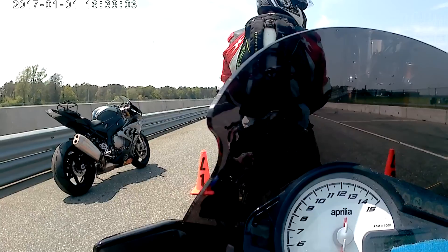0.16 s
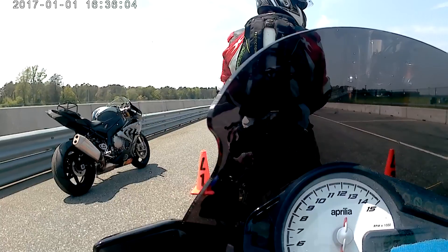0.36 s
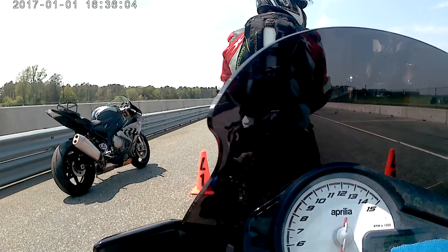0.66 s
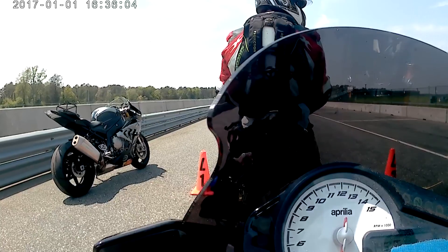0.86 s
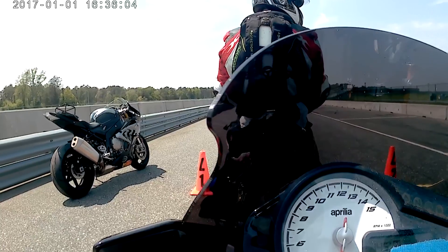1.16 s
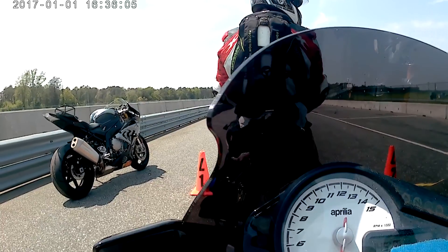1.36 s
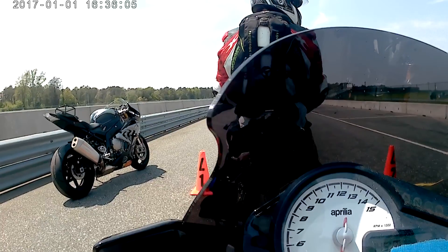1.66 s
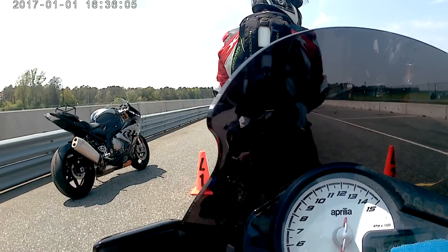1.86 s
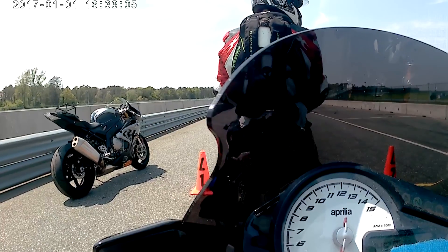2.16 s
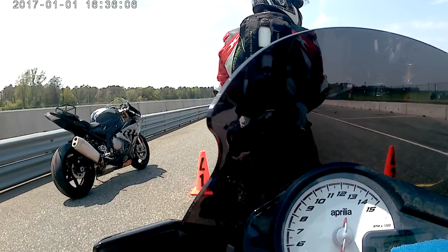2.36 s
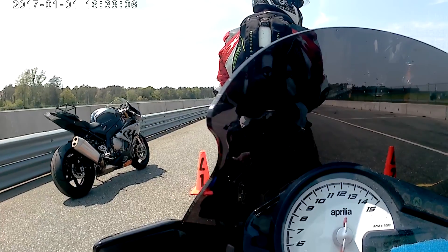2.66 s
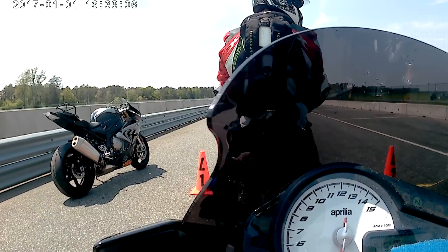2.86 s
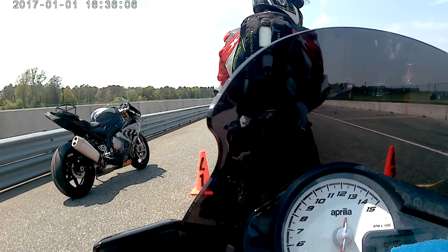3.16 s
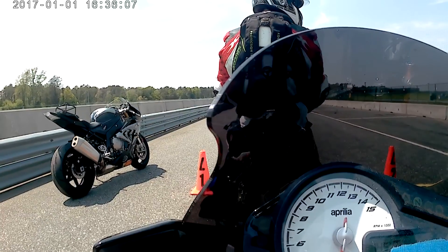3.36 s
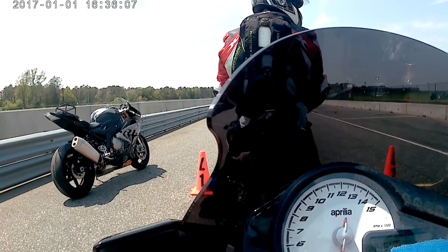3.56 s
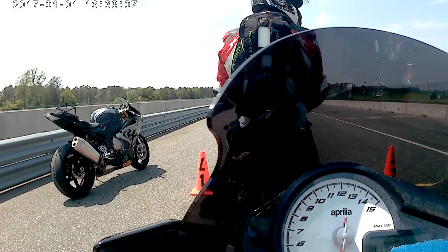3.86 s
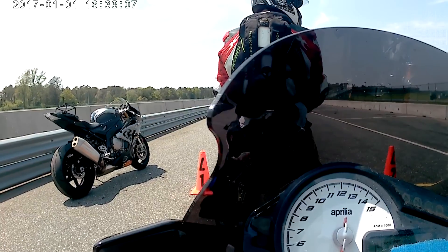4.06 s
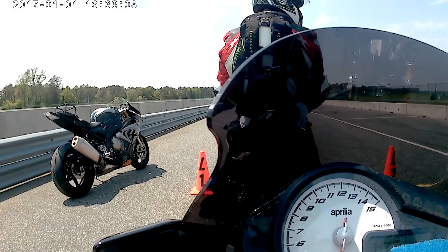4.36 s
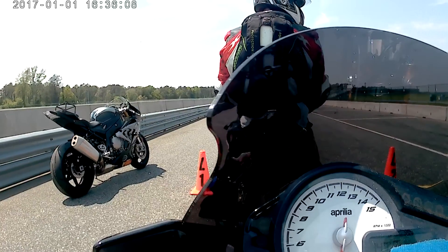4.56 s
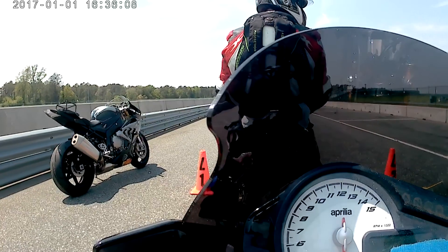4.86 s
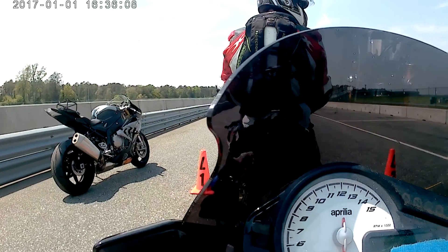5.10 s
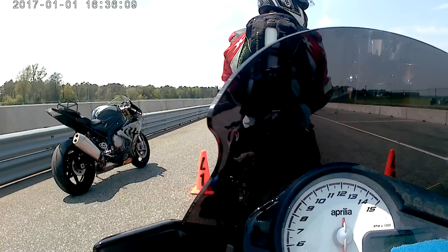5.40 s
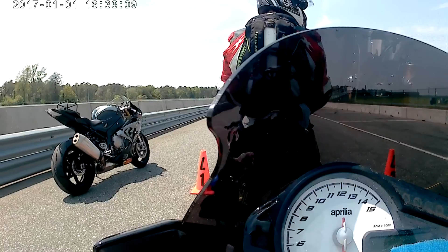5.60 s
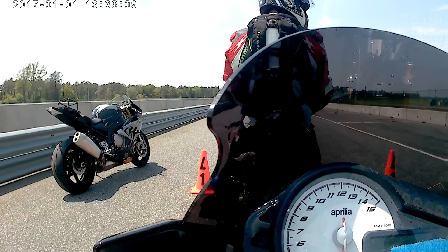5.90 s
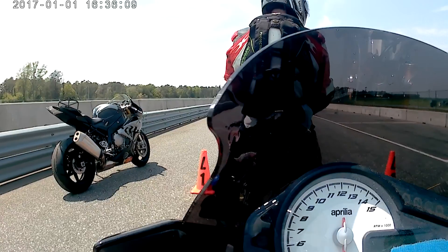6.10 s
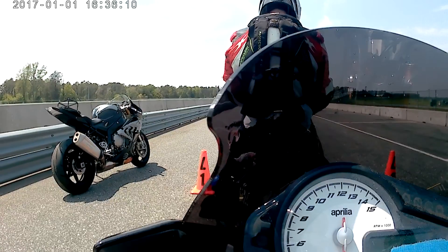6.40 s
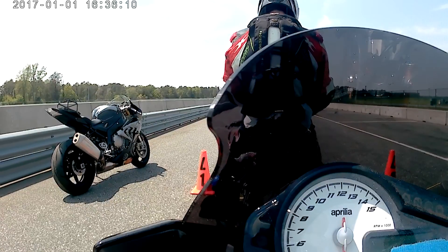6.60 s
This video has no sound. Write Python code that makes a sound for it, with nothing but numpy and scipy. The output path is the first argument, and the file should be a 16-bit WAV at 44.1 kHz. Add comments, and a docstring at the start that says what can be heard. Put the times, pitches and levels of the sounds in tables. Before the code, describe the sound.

A small camera bolted to an idling motorcycle picks up crushed, dull-trebled engine throb, rattling valve gear and flickering fairing buzz. The engine stops just past four seconds with a brief knock and stumble. Its bracket keeps wobbling at a deep note that fades, exposing far-off engines and wind at an open race track, then one faint rising chirp and a last-moment hum.

```python
"""A four-cylinder motorcycle idles, then is switched off; a small camera is bolted to its fairing.
Uneven firings excite resonances of the frame; valve gear noise rings the panels and the camera case.
A fairing panel buzzes in bursts, and the camera bracket sways at its own low note, then rings free.
A distant track rumbles behind as shaped noise; a faint chirp and a swelling hum come at the end.
The input saturates, so the strong shaking is flattened, and a narrow band dulls the treble."""
import sys
import numpy as np
from scipy import signal
from scipy.fft import rfft, irfft
from scipy.io import wavfile
from scipy.ndimage import uniform_filter1d

SR = 44100
rng = np.random.default_rng(int(sys.argv[2]) if len(sys.argv) > 2 else 0)


def log_audio(samples):
    """Write samples as a 16-bit WAV file to the path given in sys.argv[1]."""
    # one column per channel
    frames = np.atleast_2d(samples).T
    # limit to full scale, then quantise
    limited = np.clip(frames, -1, 1)
    pcm = np.round(limited * 32767).astype(np.int16)
    wavfile.write(sys.argv[1], SR, pcm)


N = 297216
TIME_S = np.arange(N) / SR
COAST_S, STOP_S = 4.0, 4.6  # the crank starts to slow, and stands still


def undb(db):
    """Amplitude ratio: 20 dB is a factor of ten."""
    return 10 ** (np.asarray(db) / 20)


def curves(table):
    """Linear interpolation: each column after the time column becomes one value a sample."""
    times_s, *columns = np.transpose(table)
    return [np.interp(TIME_S, times_s, column) for column in columns]


def unit(x):
    """Normalisation to an rms of one."""
    return x / np.sqrt(np.mean(x ** 2))


def ring(force, modes):
    """Modal superposition: second-order resonances in parallel, each set to its own rms level."""
    total = 0
    for mode_hz, width_hz, level_db in modes:
        b, a = signal.iirpeak(mode_hz, mode_hz / width_hz, SR)  # Q is frequency over bandwidth
        total = total + undb(level_db) * unit(signal.lfilter(b, a, force))
    return total


def tone(hz, rms_db):
    """Frequency modulation: a sine whose phase is the running sum of its frequency."""
    phase = 2 * np.pi * np.cumsum(hz) / SR
    return np.sqrt(2) * undb(rms_db) * np.sin(phase)


def walk(rate_hz):
    """Slow random modulation: levels held 1 / rate s and smoothed twice; spread near 1."""
    hold = int(SR / rate_hz)
    steps = np.repeat(rng.standard_normal(N // hold + 1), hold)
    return uniform_filter1d(uniform_filter1d(steps, hold), hold // 4)[:N]


def crank():
    """Rotation rate in engine cycles a second: a hunting idle, then a run-down to rest."""
    idle_hz, slow_start_hz, settle_s = 12.522, .23, .39  # a little slow at first
    hunt_hz, hunt_s, hunt_rises_s = .059, .969, .851  # swing either way, its period, an upward crossing
    coast_bend = 1.7  # power law of the slowing
    slow_start = slow_start_hz * np.exp(-(TIME_S / settle_s) ** 2)
    hunt = hunt_hz * np.sin(2 * np.pi * (TIME_S - hunt_rises_s) / hunt_s)
    progress = np.clip((TIME_S - COAST_S) / (STOP_S - COAST_S), 0, 1)
    return (idle_hz - slow_start + hunt) * (1 - progress ** coast_bend)


def strokes(angles_deg, late_deg, uneven_db):
    """Crank kinematics: sample and size of each blow, a row per angle, scattered from cycle to cycle."""
    start_deg = 655
    angle = start_deg + 720 * np.cumsum(crank()) / SR
    cycles = np.arange(int(angle[-1] / 720) + 1)
    late, size = rng.standard_normal((2, len(angles_deg), len(cycles)))
    blow_angle = 720 * cycles + np.array(angles_deg)[:, None] + late_deg * late
    at = np.searchsorted(angle, blow_angle)
    inside = (at > 0) & (at < N)
    return at, undb(uneven_db * size) * inside


def train(at, size, level_db):
    """Impulsive excitation: the blows as single samples, each angle at its own level."""
    weights = size * undb(level_db)[:, None]
    return np.bincount(at.ravel(), weights.ravel(), N + 1)[:N]


def firing():
    """Impulse response of the frame: gas pressure builds over a few ms and excites its modes."""
    # firings in the 720 degree cycle: crank_deg, level_db
    firings = [(0, 1), (180, -3), (425, 2), (605, 7)]
    # frame and fairing modes: mode_hz, width_hz, level_db
    frame_modes = [(54.56, 18.7, 4.5), (125, 12.5, -14.5), (199, 210, -4), (230.8, 12, -9.5),
                   (471, 131, -5.5), (720, 140, -19)]
    # a lower frame mode swings the other way: mode_hz, width_hz, level_db
    recoil_modes = [(38.3, 6, -3)]
    push_s = .003  # whole length of a pressure pulse
    crank_deg, level_db = np.transpose(firings)
    kicks = train(*strokes(crank_deg, late_deg=2.44, uneven_db=3.0), level_db)
    push = np.convolve(kicks, np.hanning(int(push_s * SR)), "same")
    return ring(push, frame_modes) - ring(push, recoil_modes)


def clatter():
    """Noise-excited resonance: knocks set off short rattles over steady gear noise."""
    # valve gear knocks in the cycle: crank_deg, panels_db, case_db
    knocks = [(125.6, -1.5, 1.5), (220, 3.5, -22), (271, -22.5, -16), (336, -3, -16.5), (379.3, -4.5, -3.5),
              (456, -1, 1.5), (496.6, 0, 1.5), (560.3, -2.5, -2.5), (667.8, 3, 6.5)]
    # panels rattled by the valve gear: mode_hz, width_hz, level_db
    panel_modes = [(130.5, 8, -12.5), (204, 61, -7.5), (305, 21.6, -8), (461.7, 44, -12.5),
                   (556, 60, -11.5), (639.5, 70, -9.5), (846.4, 73, -7)]
    # camera case: mode_hz, width_hz, level_db
    case_modes = [(1311, 23, -14), (1427.6, 59, -4.5), (1479.4, 51, -9), (2050, 126, -12.5),
                  (3130, 1400, -11)]
    crank_deg, *levels_db = np.transpose(knocks)
    at, size = strokes(crank_deg, late_deg=6.6, uneven_db=3.0)
    pole = np.exp(-1 / (0.0013 * SR))  # 1.3 ms time constant
    total = 0
    for level_db, modes in zip(levels_db, (panel_modes, case_modes)):
        # a double pole makes each rattle swell, then die
        rattle = unit(signal.lfilter([1], np.poly([pole, pole]), train(at, size, level_db)))
        envelope = (1.67 + rattle) * undb(1.13 * walk(29.95))
        total = total + ring(envelope * rng.standard_normal(N), modes)
    return total


def engine():
    """Superposition of two excitations, firing and clatter, each under its own force curve."""
    # force of the engine, dying away after the switch-off: time_s, firing_db, clatter_db
    force = [(0, -8.5, -5.5), (1.5, -5.5, -4.5), (4.0, -10, -5), (4.035, -6, 0.5), (4.06, -11, -12),
             (4.105, -3, -5.5), (4.12, -7, -7), (4.19, -18, -5.5), (4.21, -10, -13.5), (4.25, -23, -19.5),
             (4.36, -27.5, -22.5), (4.42, -13, -22.5), (4.47, -36, -30.5), (4.52, -59, -49)]
    firing_db, clatter_db = curves(force)
    return undb(firing_db) * firing() + undb(clatter_db) * clatter()


def buzz():
    """Intermittent contact: bursts of a note that flickers as the panel edge touches and lets go."""
    # its loudest bursts: time_s, note_hz, rms_db, sigma_s (of a Gaussian swell)
    loud_bursts = [(.125, 313.2, -2, 0.03), (0.196, 315.5, -12, 0.021), (0.398, 318.3, -6, 0.023),
                   (0.597, 314, -10.5, 0.0247), (0.772, 309.9, -7.5, 0.011), (1.013, 310, -4.5, 0.034),
                   (1.165, 310.4, 0, 0.023), (1.637, 312.2, -5.5, 0.018), (1.729, 319, -3, 0.013),
                   (1.912, 314.2, -5, .03), (2.13, 319.3, -6.5, .02), (2.36, 314, -2.5, .02),
                   (2.447, 318, 0, 0.026), (2.77, 311, -5.5, .02), (3.17, 313.3, 0.5, 0.018),
                   (3.406, 320, -0.5, 0.022), (3.71, 313, -7.5, 0.017), (3.88, 325, -2, 0.029),
                   (3.977, 319, -4.5, 0.02), (4.163, 316, -0.5, .028), (4.269, 321, -9, 0.057)]
    buzz_hz, buzz_deg, buzz_db, sigma_s = 314.7, 370, -12, .022  # the burst once a cycle
    at, size = strokes([buzz_deg], late_deg=22.5, uneven_db=3.5)
    size = size * undb(buzz_db) * (at < COAST_S * SR)
    hz = buzz_hz + 5.15 * walk(14)
    swell = np.zeros(N)
    for burst_s, gain in zip(at[0] / SR, size[0]):
        swell = np.maximum(swell, gain * np.exp(-.5 * ((TIME_S - burst_s) / sigma_s) ** 2))
    for burst_s, note_hz, rms_db, loud_sigma_s in loud_bursts:
        loud = undb(rms_db) * np.exp(-.5 * ((TIME_S - burst_s) / loud_sigma_s) ** 2)
        hz = np.where(loud > swell, note_hz, hz)  # the louder burst sets the note
        swell = np.maximum(swell, loud)
    return swell * tone(hz, 2. * walk(45))


def bracket():
    """Forced, then free vibration of two bending notes; a stiffer side gives the sway overtones."""
    # bracket while shaken: time_s, sway_rms_db, nod_rms_db
    shaking = [(0, 6.5, -10), (.15, -8.5, -8), (.35, 0, -7), (.75, -7, -6.5), (.9, -35, -30),
               (1.1, -17, -3), (1.55, -13, -17), (2.1, -16, -7), (2.75, -5, -15.5), (3.25, -4.5, -21.5),
               (3.55, -16, -8), (3.96, -33, -20), (4.05, 1, -4), (4.17, -3.5, -24), (4.35, -5, -25.5)]
    sway_hz, nod_hz = 43.3, 67.1
    wander_hz = .41  # the shaking pulls both notes about until the crank starts to slow
    sway_fade_s, sway_rub = 1.47, .23  # damping time; dry friction as a share of the swing
    nod_fade_db_per_s = 15
    sway_db, nod_db = curves(shaking)
    free_s = np.clip(TIME_S - shaking[-1][0], 0, None)
    wander = wander_hz * (np.arange(N) < COAST_S * SR)
    # dry friction brings the swing to a full stop
    left = np.clip((1 + sway_rub) * np.exp(-free_s / sway_fade_s) - sway_rub, 0, None)
    sway = left * tone(sway_hz + wander * walk(6.13), sway_db)
    nod = tone(nod_hz + wander * walk(6.4), nod_db - nod_fade_db_per_s * free_s)
    second = .04 * (sway ** 2 - (left * undb(sway_db)) ** 2)  # less its mean square
    third = -.1 * np.tanh(sway) ** 3
    return sway + second + third + nod


def track():
    """Spectrally shaped noise: far engines and wind through the housing; bass and treble waver apart."""
    # spectrum of the track, relative: bin_hz, density_db
    spectrum = [(15, -11), (55, 3.5), (98, -1), (186, -7.5), (259, -18), (311, -6.5), (349, -25.5),
                (450, -27.5), (900, -33), (1210, -24.5), (1450, -10), (1620, -19.5), (2100, -22),
                (2700, -35.5), (3150, -32.5), (3900, -35.5), (5000, -61), (6000, -93.5)]
    # bass of the track: time_s, level_db
    rumble = [(4.5, 8), (5.2, 1.5), (6.0, 1), (6.74, 2)]
    track_db, treble_db = -31, -5.0  # the treble level is relative to the track level
    bin_hz, density_db = np.transpose(spectrum)
    bins = np.fft.rfftfreq(N, 1 / SR) + 1  # 1 Hz up keeps the logarithm finite
    shape = undb(np.interp(np.log(bins), np.log(bin_hz), density_db))
    shaped = rfft(rng.standard_normal(N)) * shape
    bass = unit(irfft(shaped * (bins < 600), N))
    treble = unit(irfft(shaped * (bins >= 600), N))
    bass = bass * undb(curves(rumble)[0] + 1.5 * walk(16))
    treble = treble * undb(treble_db + 1.28 * walk(45))
    return undb(track_db) * (bass + treble)


def whistle():
    """Linear frequency sweep: one short faint chirp glides up under a two-sided exponential swell."""
    peak_s, peak_hz, peak_db = 5.388, 680, -37.5
    rise_hz_per_s, swell_db_per_s, drop_db_per_s = 2200, 262.5, 446
    from_peak_s = TIME_S - peak_s
    rms_db = peak_db + np.minimum(swell_db_per_s * from_peak_s, -drop_db_per_s * from_peak_s)
    return tone(np.clip(peak_hz + rise_hz_per_s * from_peak_s, 0, None), rms_db)


def hum():
    """Exponential growth: a steady low note gains equal decibels each second up to the end."""
    hum_hz, end_db, rise_db_per_s = 65., -27.5, 37.5
    to_go_s = TIME_S[::-1]
    return tone(np.full(N, hum_hz), end_db - rise_db_per_s * to_go_s)


def scene():
    """Linear superposition of all the sources, in one channel."""
    return (engine() + buzz() + bracket() + track() + whistle() + hum())[None]


def record(dry):
    """Saturation, band limiting and clipping: an overdriven input, a narrow converter, an output stage."""
    ceiling, knee = .71, 8.  # input limit in full scales; sharpness of its bend
    converter_hz, top_hz = 4050, 15780  # foot of the converter's slope; cutoff of the output
    full_scale = .716
    overload = dry / (1 + np.abs(dry / ceiling) ** knee) ** (1 / knee)
    # the saturated stage holds the slow swing flat but lets a little rattle through
    high_pass = signal.butter(2, 400, "high", fs=SR, output="sos")
    overload += .1 * signal.sosfilt(high_pass, dry - overload)
    band_hz, band_gain = [0, 3200, 3700, converter_hz, SR / 2], [1, 0.83, 0.33, 0.092, 0.047]
    taps = signal.firwin2(255, band_hz, band_gain, fs=SR, window="blackman")
    narrow = signal.fftconvolve(overload, taps[None], "same")
    # the filter rounds the flattened waves, and their overshoot is clipped
    full = np.clip(narrow, -full_scale, full_scale)
    return signal.sosfilt(signal.ellip(10, .2, 60, top_hz, fs=SR, output="sos"), full)


dry = scene()
out = record(dry)
log_audio(out)
```